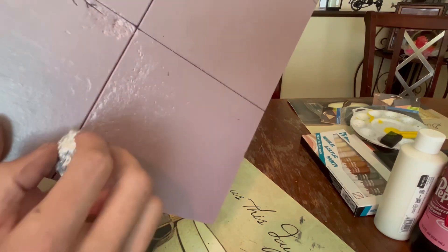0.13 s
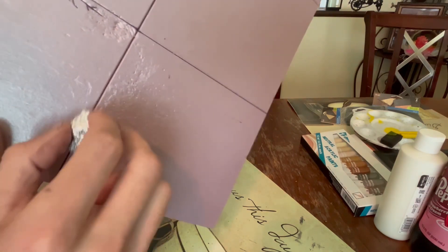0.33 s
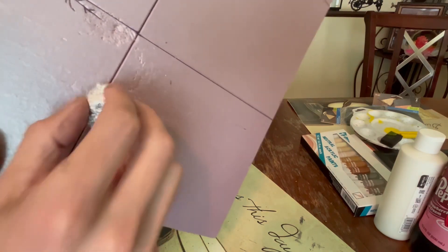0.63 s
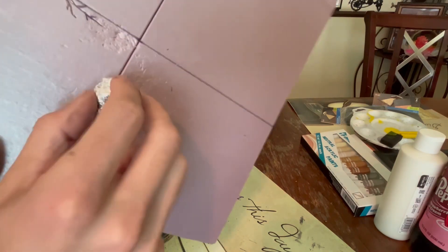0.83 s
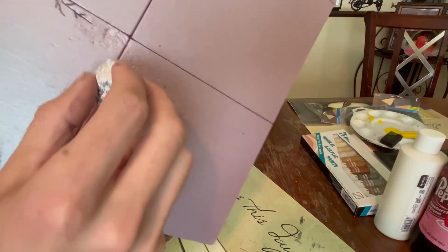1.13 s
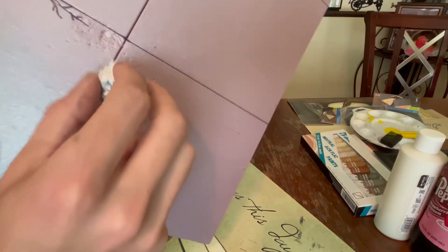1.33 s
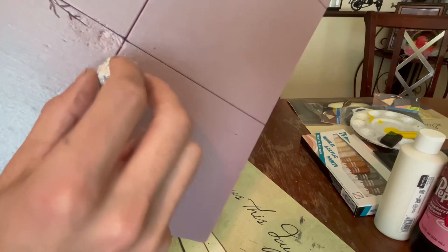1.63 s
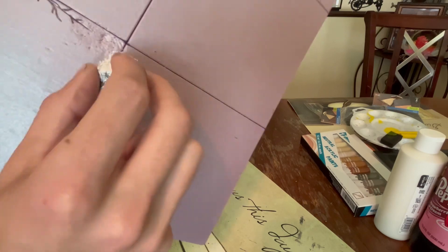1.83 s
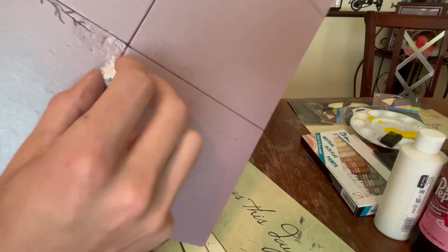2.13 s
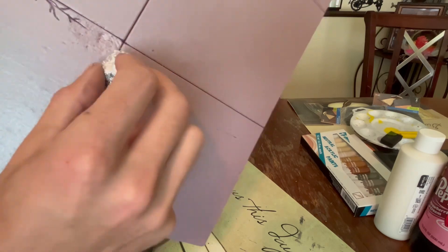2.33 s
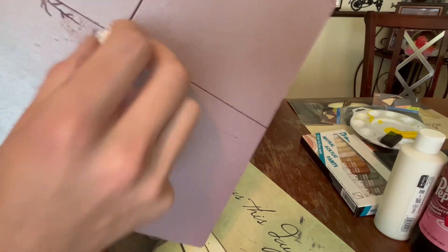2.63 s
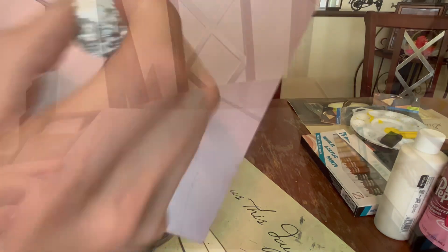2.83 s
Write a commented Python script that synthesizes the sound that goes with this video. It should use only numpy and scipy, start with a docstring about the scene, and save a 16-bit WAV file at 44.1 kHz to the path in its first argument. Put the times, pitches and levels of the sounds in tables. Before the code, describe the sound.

A crumpled aluminium foil ball dabbing quickly on a foam board with crunchy, hollow taps.

```python
"""Crunchy, hollow dabs, about five a second: a crumpled ball of aluminium foil on a hand-held foam board.
Each dab is a few milliseconds of buckling creases over a thump from the board's bending modes.
Now and then the foil ticks as it lifts off or shifts in the fingers.
It all sits close and a little to the left, in a small room that hums quietly."""
import sys
import numpy as np
from scipy import signal
from scipy.fft import rfft, irfft, next_fast_len
from scipy.io import wavfile

SR = 44100
rng = np.random.default_rng(int(sys.argv[2]) if len(sys.argv) > 2 else 0)


def dump(signal):
    """Clip the signal to [-1, 1] and save it as 16-bit WAV at the path in sys.argv[1]."""
    limited = np.clip(np.atleast_2d(signal).T, -1, 1)
    pcm = np.round(limited * 32767).astype(np.int16)
    wavfile.write(sys.argv[1], SR, pcm)


N = 132300
SIZE = next_fast_len(N + SR)
HZ = np.maximum(np.fft.rfftfreq(SIZE, 1 / SR), 1e-3)
TIME = np.arange(N) / SR

# The ball landing on the board; give_s is the time the creases take to give way:
# start_s, push_db, hardness_hz, give_s, boom_db, knock_hz, knock_db, crunch_db, sizzle_db
DABS = [(0.1027, -1.5, 237, 0.003, -4.5, 694, 5, -1.5, -1),
        (0.2935, -3.5, 347, 0.0012, -2, 320, -1.5, 0, -2.5),
        (0.4863, -3, 464, 0.00037, -3, 340, -3, 3, -1.5), (.6559, -3.5, 435, 0, -1, 330, 1, 1, 0),
        (.8318, -2, 430, 0, -1.5, 340, -7.5, 0, -1.5), (1.0357, 0, 540, .0003, -1, 636, -3, -1, 1),
        (1.245, 0, 573, 0.00053, -0.5, 650, -17, -2.5, 2.5), (1.4798, 0, 726, 0, -1, 780, 6, 0, 3),
        (1.6936, -1, 1010, 0.00014, -0.5, 810, 8, 1.5, 2.5), (1.9155, 1, 544, 0, 0.5, 835, 3, 1, 2.5),
        (2.1143, 0, 495, 0.00027, 0, 950, -3, 2, 4.5), (2.3198, 1.5, 690, 0.00032, -0.5, 1170, 8, 1, 0),
        (2.4983, 0, 553, 0.00014, -1, 1140, 8, -4.5, -2.5), (2.6522, 2, 750, 0, 0, 1150, 4.5, 3.5, 4.5)]


def from_db(db):
    """Decibels to gain."""
    return 10 ** (np.asarray(db) / 20)


def curve(rows):
    """A table of frequency and value, drawn across the spectrum on a log-frequency axis."""
    freq_hz, values = np.transpose(rows)
    return np.interp(np.log(HZ), np.log(freq_hz), values)


def colour(eq):
    """Spectrum of a causal (minimum-phase) filter that follows an EQ curve."""
    cepstrum = irfft(np.log(from_db(curve(eq))), SIZE)
    cepstrum[1:SIZE // 2] *= 2
    cepstrum[SIZE // 2 + 1:] = 0
    return np.exp(rfft(cepstrum))


def resonance(hz, width_hz):
    """Spectrum of one resonance, gain 1 at its peak."""
    return 1j * HZ * width_hz / (hz ** 2 - HZ ** 2 + 1j * HZ * width_hz)


def diffuse_noise():
    """Stereo spectra of white noise in a diffuse field: centred in the bass, wide in the treble."""
    # Likeness of left and right: freq_hz, correlation
    likeness = [(60, 1), (300, 0.61), (800, 0.1), (3000, 0.033)]
    alike = curve(likeness)
    mid, side = rfft(rng.standard_normal((2, SIZE)))
    return (np.sqrt(1 + alike) * mid + np.sqrt(1 - alike) * side * [[1], [-1]]) / np.sqrt(2)


def room_hum(level_db=-46.5):
    """The bed: steady, low room tone."""
    # Colour of the room tone: freq_hz, relative_db
    hum_eq = [(25, -21), (55, 0.5), (90, -1.5), (150, -2), (235, -4.5), (320, -6), (450, -14.5),
              (650, -21.5), (820, -11), (1000, -22.5), (1500, -19), (2800, -35), (4800, -38.5), (6500, -51),
              (12000, -53.5), (16000, -64)]
    noise = irfft(diffuse_noise() * from_db(curve(hum_eq)), SIZE)[:, :N]
    return from_db(level_db) * noise / np.std(noise)


def room_bands(build_s=0.007):
    """Yields each reverb band's share of the spectrum and its swelling, dying envelope."""
    # Reverb of the small room: centre_hz, level_db, t60_s
    reverb = [(60, -20.5, 0.55), (150, -15.5, .5), (330, -14.5, .45), (770, -9, 0.29), (2160, -4.5, 0.4),
              (4440, -4, 0.39), (8000, -5.5, 0.32), (13200, -15.5, 0.29), (15300, -24, 0.23)]
    t = TIME[:SR * 2 // 3]
    centres = np.log([row[0] for row in reverb])
    for share, (_, db, t60_s) in zip(np.eye(len(reverb)), reverb):
        fade = (1 - np.exp(-(t / build_s) ** 2)) * from_db(-60 * t / t60_s)
        yield np.interp(np.log(HZ), centres, share), from_db(db) * fade / np.sqrt(np.sum(fade ** 2))


def room_response():
    """Spectrum of the room's tail, as the thumps ring it."""
    noise = diffuse_noise()
    tail = sum(irfft(noise * share, SIZE)[:, :len(fade)] * fade for share, fade in room_bands())
    return rfft(tail, SIZE)


def room_wash(snaps, eq):
    """The foil's snaps fly in all directions and return as a diffuse wash that follows their energy."""
    noise = diffuse_noise() * from_db(curve(eq))
    energy, wash = rfft(snaps ** 2), 0
    for share, fade in room_bands():
        lingering = irfft(energy * rfft(fade ** 2, SIZE), SIZE)
        wash = wash + irfft(noise * share, SIZE) * np.sqrt(np.abs(lingering))
    return wash


def direct_path(lag_s):
    """Spectra of the straight path to two microphones, the right one lag_s later."""
    # Pan of the direct sound: freq_hz, left_minus_right_db
    pan = [(50, 3.5), (130, 6.5), (310, 0), (600, 1), (1300, 11.5), (4000, 9.5), (7000, -0.5), (9500, -10),
           (12000, 0.5)]
    sides = np.array([[1], [-1]])
    return from_db(curve(pan) / 2 * sides) * np.exp(1j * np.pi * HZ * lag_s * sides)


def board_thumps(boom_below_hz=110, knock_q=4.24):
    """Spectrum of the board: each cushioned push rings its bending modes, the low ones arriving last."""
    # Bending modes, neighbours swinging in opposite directions: pitch_hz, width_hz, level_db
    bending_modes = [(57.6, 25.1, 37.5), (74.6, 83, 33.5), (147.2, 31.5, 37.5), (211, 57, 24),
                     (264, 21, 29.5), (299.3, 42.1, 37.5), (376, 46, 37.5), (527, 280, 23.5),
                     (810, 47, 13.5), (1077, 102, 14), (1510, 83, 2)]
    boom = body = thumps = 0
    for k, (hz, width_hz, db) in enumerate(bending_modes):
        travel_s = 0.0011 * np.sqrt(100 / hz)   # higher bending waves cross the board faster
        mode = (-1) ** k * from_db(db) * resonance(hz, width_hz) * np.exp(-2j * np.pi * HZ * travel_s)
        if hz < boom_below_hz:
            boom += mode
        else:
            body += mode
    for start_s, push_db, hardness_hz, give_s, boom_db, knock_hz, knock_db, _, _ in DABS:
        delay = np.exp(-2j * np.pi * HZ * (start_s + give_s))
        push = from_db(push_db) * delay / (1 + 1j * HZ / hardness_hz) ** 3
        # The knock is the ball's short bounce on the skin of the board.
        bounce = 1 + from_db(knock_db) * resonance(knock_hz, knock_hz / knock_q)
        thumps += push * bounce * (from_db(boom_db) * boom + body)   # the spot hit sets the boom
    return thumps


def creases(envelope, per_s=7000, spread_db=2.5):
    """Creases buckle at random: snaps of uneven size under an envelope, total energy 1."""
    count = len(envelope)
    sizes = from_db(spread_db * np.minimum(rng.exponential(1, count), 2)) * rng.choice([-1, 1], count)
    snaps = sizes * (rng.random(count) < per_s / SR) * envelope
    return snaps / np.sqrt(np.sum(snaps ** 2) + 1e-12)


def place(track, start_s, sound):
    """Mix a sound into a stereo track; the right side lags a little more or less as the hand moves."""
    lag_s = rng.normal(0.0002725, 0.00003)
    for channel, arrival_s in zip(track, (start_s - lag_s / 2, start_s + lag_s / 2)):
        start = int(arrival_s * SR)
        channel[start:start + len(sound)] += sound


def foil_layers(crunch_s=0.0039, settle_s=0.02, crinkle_s=0.079, tick_s=0.0047):
    """Creases buckle as the ball lands, settles and lifts. Returns (snaps, eq): crunch, sizzle, ticks."""
    # Colour of the coarse creases: freq_hz, level_db
    crunch_eq = [(300, -4.5), (800, -3), (1600, -0.5), (2500, -6.5), (4200, -8), (5200, -10), (6200, -25),
                 (8000, -29), (11000, -49)]
    # Colour of the fine creases: freq_hz, level_db
    sizzle_eq = [(2000, -35), (5000, -17), (7000, -17.5), (8300, -21), (9500, -14.5), (11500, -14.5),
                 (13300, -17), (15300, -30), (16300, -25)]
    # Colour of the thin ticks: freq_hz, level_db
    tick_eq = [(500, -26), (3500, -3), (6000, -8.5), (9000, -3), (13000, 4), (16000, -16)]
    # The foil lifting off or shifting: start_s, relative_db
    tick_cues = [(0.155, -11.5), (.3411, -5), (0.529, -6.5), (.881, -14), (1.3174, -10), (1.943, -13),
                 (2.607, -7.5), (2.615, -14), (2.6842, 1), (2.8419, -18)]
    crunch, sizzle, ticks = np.zeros((3, 2, SIZE))
    t = TIME[:SR // 6]
    settling = from_db(-14) * np.exp(-t / settle_s)   # creases go on yielding under the fingers
    for start_s, _, _, give_s, _, _, _, crunch_db, sizzle_db in DABS:
        landing = np.exp(-(t / (crunch_s + 0.5 * give_s)) ** 4)
        envelope = landing + settling
        stray_snaps = from_db(-15.5) * creases(np.exp(-t / crinkle_s), per_s=130)
        place(crunch, start_s, from_db(crunch_db + 1) * creases(envelope))
        place(sizzle, start_s, from_db(sizzle_db) * (creases(envelope) + stray_snaps))
    for start_s, db in tick_cues:
        place(ticks, start_s, from_db(db - 19) * creases(np.exp(-t / tick_s)))
    return [(crunch, crunch_eq), (sizzle, sizzle_eq), (ticks, tick_eq)]


def scene():
    """Board and foil up close, with the room's reverb and hum around them."""
    # The board's later arrival on the right: freq_hz, lag_s
    board_lag = [(60, .0001), (250, 0.00013), (600, 0.00044), (1200, 0.00038)]
    mix = irfft(board_thumps() * (direct_path(curve(board_lag)) + room_response()), SIZE)
    for snaps, eq in foil_layers():
        close = irfft(rfft(snaps) * colour(eq) * direct_path(lag_s=0), SIZE)
        mix += close + room_wash(snaps[0], eq)
    return mix[:, :N] + room_hum()


def record(dry, low_cut_hz=30, high_cut_hz=17100):
    """A gentle low cut and a steep high cut."""
    dry = signal.sosfilt(signal.butter(2, low_cut_hz, "high", fs=SR, output="sos"), dry)
    return signal.sosfilt(signal.cheby2(12, 70, high_cut_hz, fs=SR, output="sos"), dry)


dry = scene()
out = record(dry)
dump(out)
```